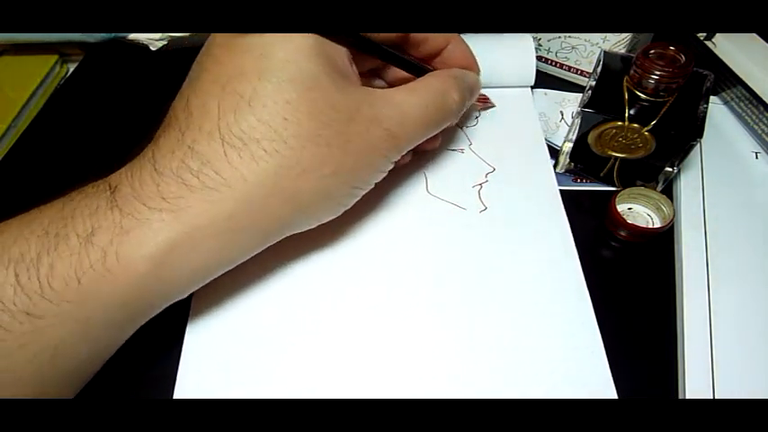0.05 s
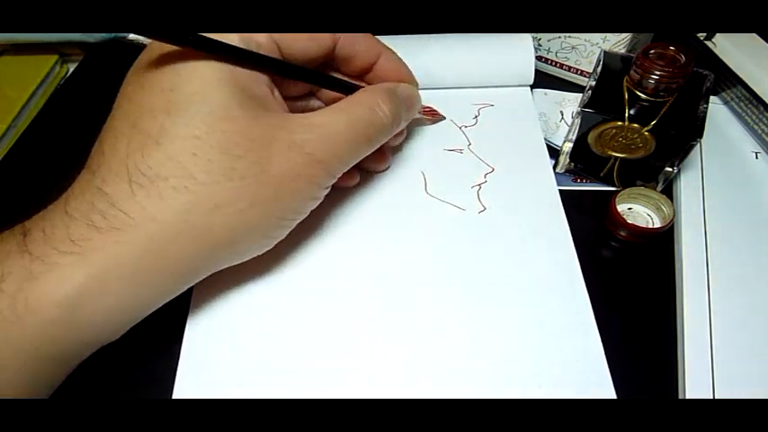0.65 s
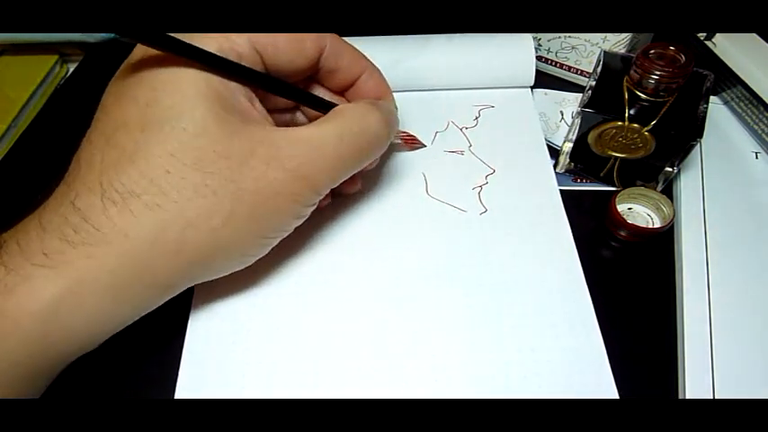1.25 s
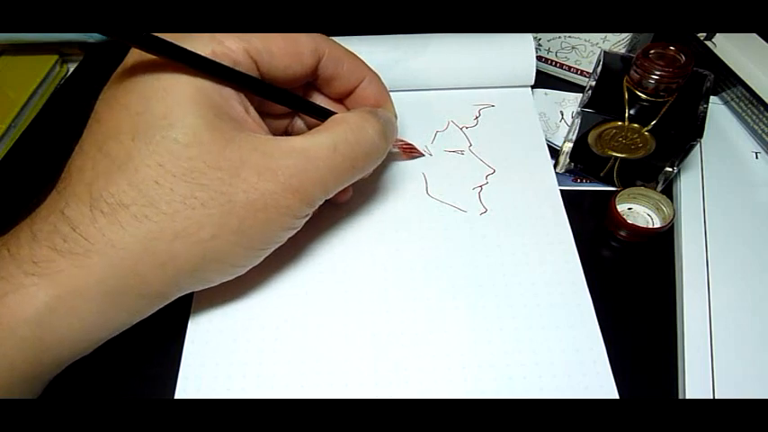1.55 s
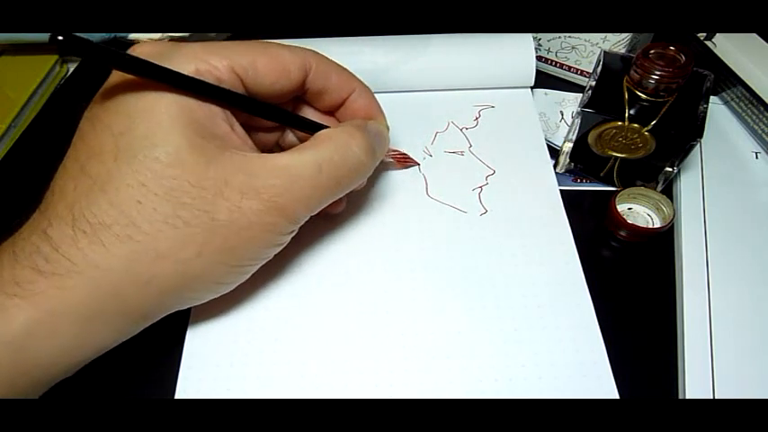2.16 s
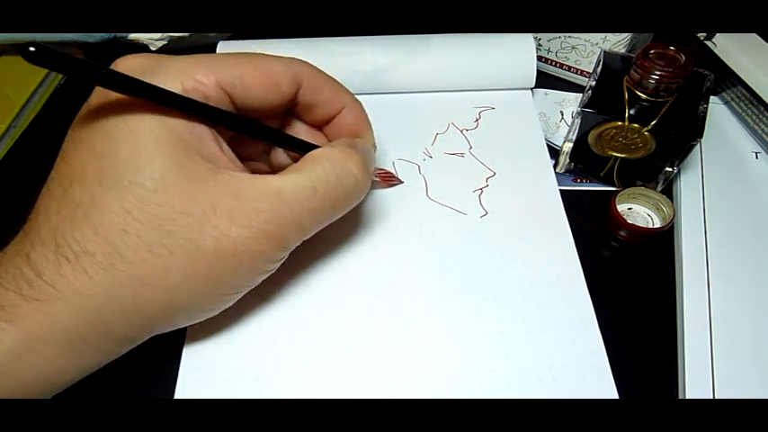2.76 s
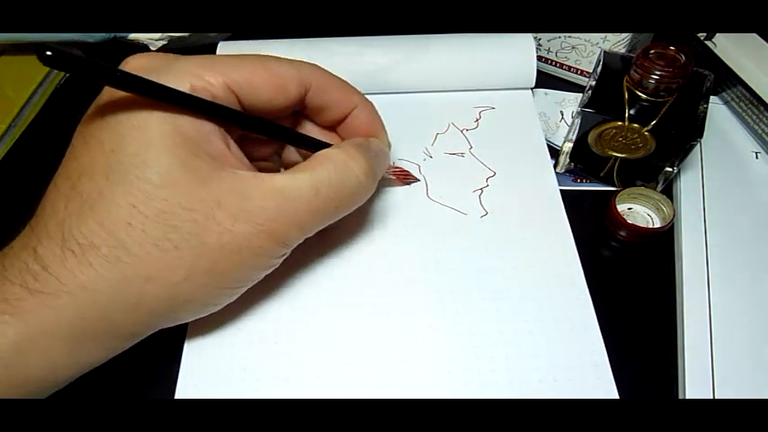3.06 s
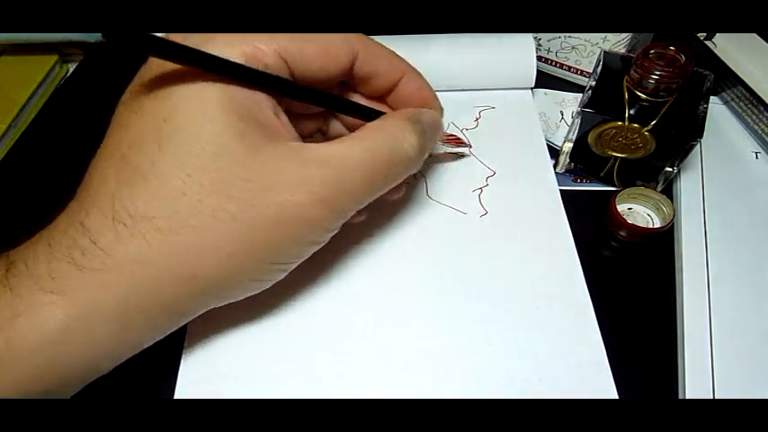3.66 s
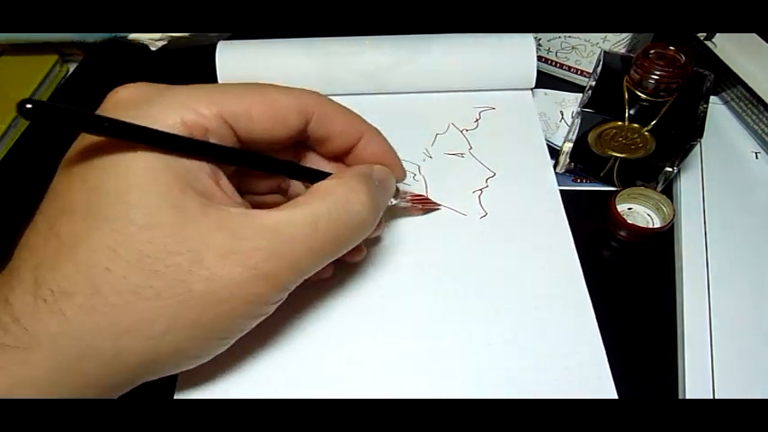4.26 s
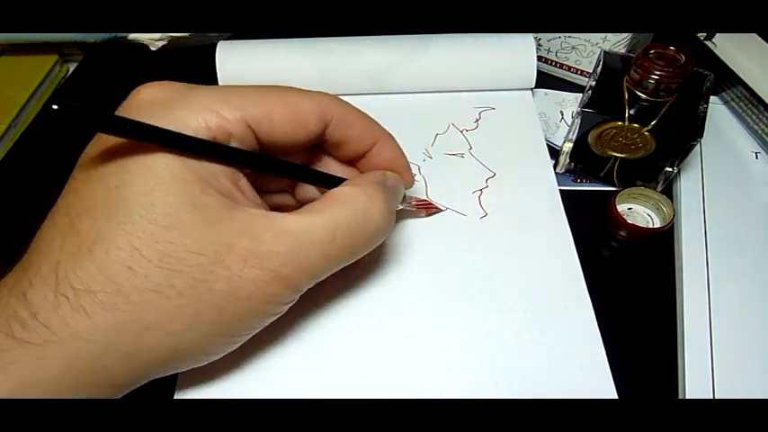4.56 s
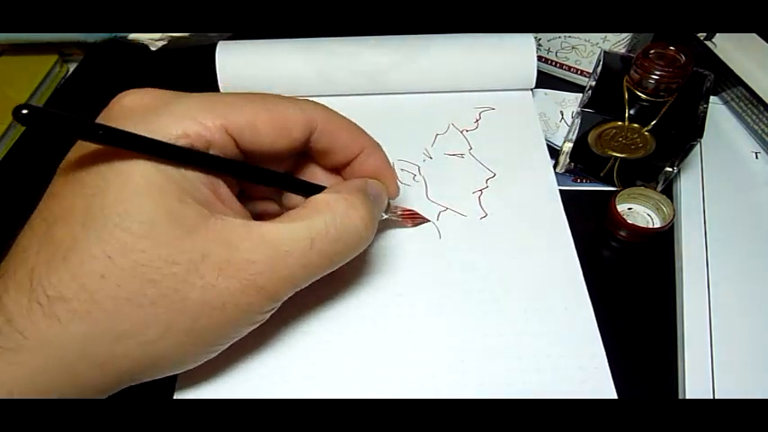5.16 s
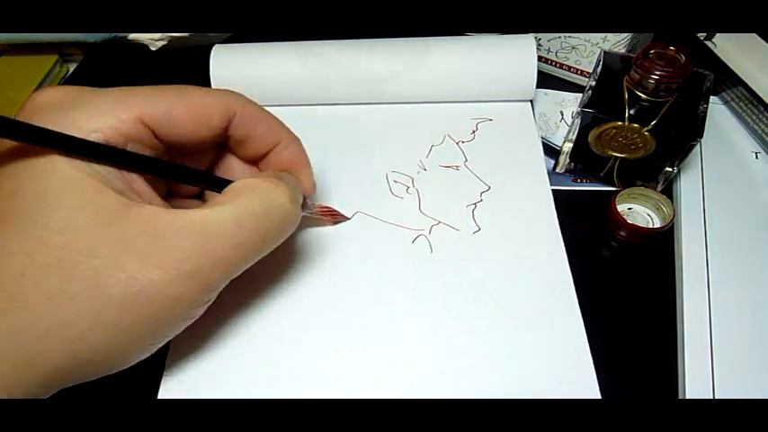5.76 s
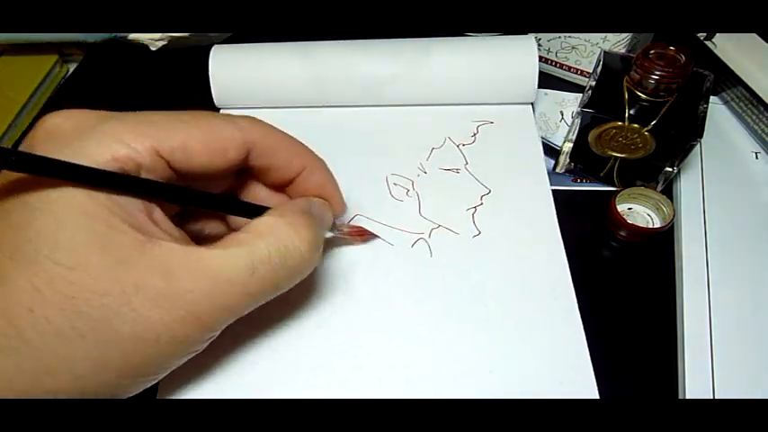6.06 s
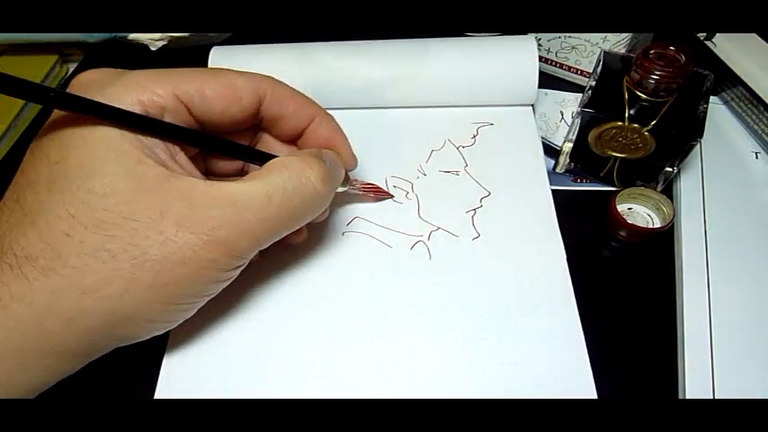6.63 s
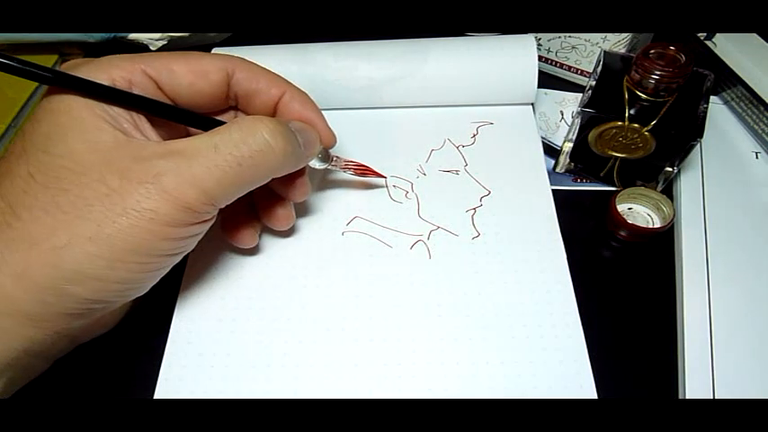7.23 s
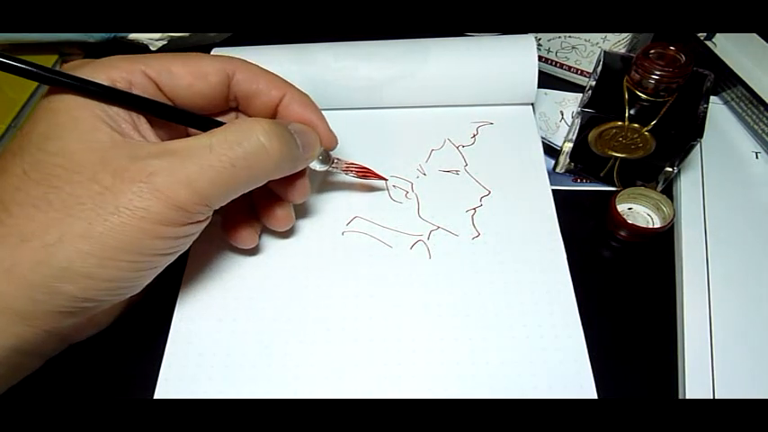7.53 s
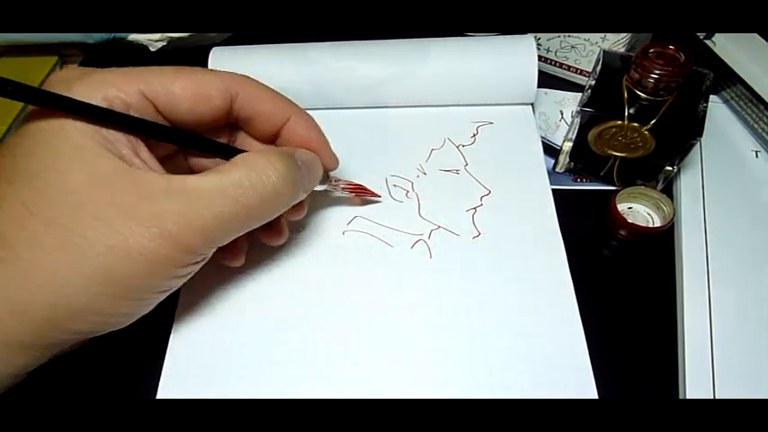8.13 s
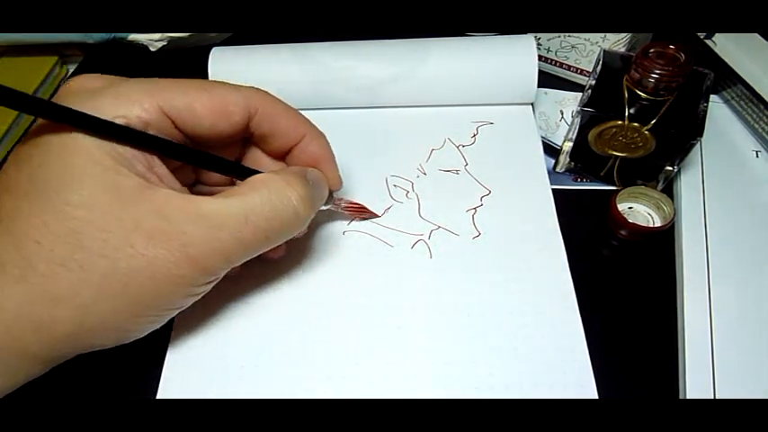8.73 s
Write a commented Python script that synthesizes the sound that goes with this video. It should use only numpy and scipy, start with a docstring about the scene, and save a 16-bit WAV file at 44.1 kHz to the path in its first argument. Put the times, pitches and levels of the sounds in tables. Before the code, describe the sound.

A fan motor hums with a slow throb over steady hiss for the whole nine seconds, in a quiet furnished room with little echo. Close to the microphone, a dip pen scratches on a paper pad in faint, dry strokes, each about a tenth of a second long. The nib lands with a small, hollow tap at 0.2 seconds and more lightly around 0.8 and 1.3. Irregular strokes continue until 3.4 seconds, pause, then return from 4.5 to 6.3. Around 6.9 seconds a hand rubs the paper, with a soft tick. At about 7.3 seconds something small and hard clatters once on the desk, a rapid cluster of clicks and knocks ending in a sharp, briefly ringing hit, by far the loudest sound. The hand shifts softly near 7.7 and 8.2 seconds, and three more pen strokes follow between 8.4 and 8.8.

```python
"""Short, scratchy strokes are heard first: a dip pen sketching on a paper pad, near a small camera.
The nib plucks paper fibres, and these impulses excite the resonances of sheet, pad and nib.
Late on, something small and hard clatters once on the desk, each impact ringing both bodies.
Behind, a fan motor hums with a slow throb over steady hiss and a few faint, thin whistles.
The two microphone ports are of nearly opposite polarity, and the right one is thin in the bass."""
import sys
import numpy as np
from scipy import signal
from scipy.fft import rfft, irfft, next_fast_len
from scipy.io import wavfile
from scipy.ndimage import map_coordinates

SR = 44100
rng = np.random.default_rng(int(sys.argv[2]) if len(sys.argv) > 2 else 0)


def wav_record(signal):
    """Record a signal, one row per channel, as 16-bit PCM in the file named by sys.argv[1]."""
    frames = np.transpose(np.atleast_2d(signal))
    bounded = np.clip(frames, -1, 1)
    # unit amplitude maps onto the largest positive 16-bit level
    quanta = np.round(bounded * 32767).astype(np.int16)
    wavfile.write(sys.argv[1], SR, quanta)


N = 392049

# nib strokes: t/s, length/s, level/dB, paper's low rustle/dB, pad's hollow ring/dB, nib's ring/dB,
# sizzle of the edge digging in/dB
STROKES = [(-0.03, 0.086, -52.5, -6, 12, 6, -8), (0.166, 0.085, -41.5, 1.5, 2.5, 10, -9.5),
           (0.755, 0.11, -45, 1, 4, 9.5, -5.5), (0.945, 0.09, -45.5, 5.5, 3.5, 14, -4.5),
           (1.288, 0.068, -48, 8, -2, 7, -1), (1.416, 0.05, -54, 3, 10, 4, 6),
           (1.93, 0.095, -53.5, 3, 1, 6, -6), (2.204, 0.12, -47.5, 1.5, 8.5, 8, 0.5),
           (2.5, 0.14, -49.5, 5.5, 0, 10, -4), (2.766, 0.11, -54.5, 7, 11.5, 8, -2),
           (3.086, 0.15, -56.5, 8, 11, 6, -6), (3.278, 0.081, -47.5, 0, 8.5, 6, 1),
           (3.38, 0.04, -52.5, 10, -9, 4, -1), (4.537, 0.088, -49, 5, 7.5, 4, -13),
           (4.693, 0.11, -50, 5, 7.5, 3, -9), (5.059, 0.11, -46.5, 2, -1, 3, -4.5),
           (5.135, 0.073, -52.5, 3, 7, 3, -5), (5.182, 0.13, -44, 2, 3, 6, -11),
           (5.508, 0.2, -45.5, 2, 5.5, 7, -1.5), (5.706, 0.14, -44.5, -1, 3.5, 5, -11.5),
           (6.048, 0.12, -44, 5.5, 6, 6, 1.5), (6.19, 0.085, -48.5, 0, -4, 4, -14),
           (8.422, 0.1, -44.5, -6, -3, 6, -12), (8.639, 0.079, -44.5, -2, 3, 9, -15),
           (8.721, 0.088, -42.5, -1.5, 8, 6, -14.5)]
# spectral envelope of the pad: f/Hz, level/dB
PAD_SPECTRUM = [(60, -43.5), (250, -8.5), (470, -8.5), (620, -21.5), (780, -9.5), (1150, -11.5),
                (1900, -14), (2600, -10.5), (4400, -13.5), (5100, -14), (6300, -21.5), (7200, -24.5),
                (9000, -38.5), (9900, -71)]
# resonances of the pad: f/Hz, width/Hz, gain/dB
PAD_MODES = [(2230, 100, 2), (3400, 140, 4.5), (4600, 130, 1.5), (6740, 110, 4.5), (7440, 270, 4.5),
             (8500, 250, 5), (9400, 200, 10)]
# the top sheet's resonance, set by where the nib works: t/s, f/Hz
SHEET_RESONANCE = [(0.2, 1100), (1.0, 1040), (3.3, 1040), (4.7, 945), (6.1, 870), (8.7, 950)]
# the hand shifting on the paper: t/s, length/s, level/dB
HAND_SHIFTS = [(0.326, 0.14, -51), (6.86, 0.12, -43.5), (7.698, 0.058, -46), (8.197, 0.29, -53)]
# friction of soft skin relative to the nib: f/Hz, gain/dB
SKIN_COLOUR = [(1080, -3), (1450, 5.5), (1900, -1), (3600, -1.5), (7300, -12.5)]
# the nib landing on the pad: t/s, level/dB
NIB_TAPS = [(0.198, -27), (0.787, -40), (1.325, -41)]
# impacts on the desk: t/s, click/dB, object's ring/dB, thump/dB, thump f/Hz, knock/dB, knock f/Hz
IMPACTS = [(6.886, -46, -49, -55, 350, -32, 1500), (7.2417, -41, -50, -46, 350, -29, 1500),
           (7.2643, -36, -40, -24, 360, -38, 620), (7.277, -20, -32, -14.5, 354, -27, 620),
           (7.288, -23, -34, -33, 406, -32, 830), (7.2971, -22, -36, -29, 398, -29, 1500),
           (7.3093, -14, -18, -24, 316, -24, 1500), (7.321, -28, -38, -10.5, 378, -12.5, 850),
           (7.3382, -11.5, -0.5, -35, 397, -7.5, 1500), (7.3408, -32, -36, -9.5, 316, -22, 650),
           (7.3443, -19, -15, -29, 298, -36, 1500)]
# spectral envelope of the object's clicks: f/Hz, level/dB
CLICK_SPECTRUM = [(60, -26), (200, -13), (400, -9), (1050, -8), (2000, -5.5), (2500, -5.5), (2950, -6.5),
                  (4050, -6), (5000, -9), (5500, -9), (6000, -18), (6900, -23), (8600, -42.5), (9500, -46),
                  (10300, -54), (11000, -76)]
# peaks and dips in that envelope: f/Hz, width/Hz, gain/dB
CLICK_PEAKS = [(1500, 310, 4.5), (2230, 110, 3), (2570, 140, -6), (3600, 250, -6), (4400, 220, 5.5)]
# the object's bright modes: f/Hz, level/dB, T60/s
OBJECT_MODES = [(3150, -7, 0.011), (3670, -6, 0.01), (4380, -6.5, 0.017), (4680, -9.5, 0.019)]
# the desk's modes: f/Hz, level/dB, T60/s
DESK_MODES = [(620, 8.5, 0.025), (825, -1, 0.054), (1500, 4.5, 0.011)]
# the thin scrape of the skid: f/Hz, level/dB
SKID_SPECTRUM = [(1300, 2), (2500, -7), (4200, -3), (6000, 1.5)]
# the fan motor's line spectrum: f/Hz, level/dB, throb depth (0-1)
MOTOR_LINES = [(118.7, -67.5, 0.4), (191, -80, 1), (239.1, -43, 0.62), (265.1, -56.5, 0.16),
               (362, -58, 0.08), (484, -69.5, 0)]
# moving air: f/Hz, level/dB
AIR_SPECTRUM = [(20, -21), (55, -9.5), (130, -6), (200, -2.5), (260, 4), (292, -1.5), (320, 2), (400, -5.5),
                (700, -6), (1500, -10), (2650, -15.5), (2950, -11.5), (3500, -19), (4500, -22), (6500, -32),
                (10000, -69.5)]
# faint whistles: start t/s, end t/s, start f/Hz, end f/Hz, level/dB
WHISTLES = [(1.95, 2.05, 5050, 4950, -67), (4.74, 4.92, 5300, 5350, -65), (4.86, 4.95, 6520, 6750, -67),
            (4.93, 5.13, 5020, 5200, -64.5), (7.21, 7.27, 5400, 5550, -65)]
# the room's reverberation time: f/Hz, T60/s
ROOM_DECAY = [(150, 0.25), (320, 0.29), (900, 0.21), (4000, 0.23), (9000, 0.15)]
# right port relative to left: f/Hz, gain/dB, phase lag/rad
RIGHT_PORT = [(60, -13.5, 1.04), (190, -11.5, 1.22), (257, -8, 1.74), (580, -3, 2.124), (890, -2, 2.505),
              (2480, -0.84, 2.548), (4920, 0.5, 2.34), (8040, 11, 1.2), (8140, 11, 4.5)]
# each port's self-noise: f/Hz, level/dB
HISS_SPECTRUM = [(20, -22), (100, -8), (450, 10), (1500, 0), (3300, 1), (5500, 0.5), (6500, -3),
                 (7300, -10.5), (9000, -21), (10000, -33), (11000, -44)]

HOLLOW_FROM_HZ, HOLLOW_TO_HZ = 1392, 1502  # the pad's hollow ring rises as the nib travels


def pen(fibres_per_s=9000, scatter_db=2.0, catch_db=1.5, gain_db=-1.46):
    """Impulse excitation: nib and hand pluck paper fibres at random, and the pad resonates."""
    plucks = (rng.random(N) < fibres_per_s / SR) * rng.standard_normal(N)
    plucks *= amp(scatter_db * rng.standard_normal(N))
    plucks *= amp(catch_db * wobble(90))  # the nib catches and frees unevenly
    friction = amp(gain_db) * unit(resonate(plucks, PAD_SPECTRUM, PAD_MODES))
    out = np.zeros(N)
    for start, length, db, *colour in STROKES:
        scratch = amp(db) * slide(friction, start, length)
        sheet_hz = np.interp(start, *np.transpose(SHEET_RESONANCE))
        early = filtered(scratch, stroke_response(db, *colour, HOLLOW_FROM_HZ, sheet_hz))
        late = filtered(scratch, stroke_response(db, *colour, HOLLOW_TO_HZ, sheet_hz))
        travel = np.sin(np.linspace(0, np.pi / 2, len(scratch))) ** 2
        add(out, max(start, 0), early + travel * (late - early))
    for start, length, db in HAND_SHIFTS:
        rub = filtered(slide(friction, start, length), lambda hz: amp(along(SKIN_COLOUR, hz)))
        add(out, start, amp(db) * rub)
    return out


def slide(friction, start, length, attack_s=0.064, release_s=0.053):
    """Friction noise follows sliding speed, which rises, holds and falls."""
    i = np.arange(max(round(start * SR), 0), round((start + length) * SR))
    t = i / SR - start
    speed = np.minimum(t / min(attack_s, length / 2), (length - t) / min(release_s, length / 2))
    return friction[i] * np.sin(np.pi / 2 * speed.clip(0, 1))


def stroke_response(db, body_db, ring_db, nib_db, sizzle_db, hollow_hz, sheet_hz, usual_db=-41.5):
    """Resonant filtering: sheet, pad and steel nib each add a peak; pressure and sizzle add rasp."""
    rasp_db = -0.5 + 0.25 * (db - usual_db) + 0.29 * sizzle_db
    slope = [(1080, body_db), (1330, 0), (1900, 0), (3600, rasp_db), (5500, rasp_db), (7300, sizzle_db)]
    peaks = [(sheet_hz, 177, 8), (hollow_hz, 153, 12.5 + ring_db), (3930, 190, nib_db)]
    return lambda hz: amp(envelope_db(slope, peaks, hz))


def nib_taps(t60=0.035):
    """Free vibration: the landing nib strikes the pad's hollow mode."""
    out = np.zeros(N)
    for start, db in NIB_TAPS:
        add(out, start, amp(db) * mode(HOLLOW_FROM_HZ, t60))
    return out


def clatter(snap=0.72, grit=0.88, click_t60=0.022, ring_top_hz=5200, click_room_db=-10, desk_room_db=-19):
    """Impact excitation: a hard object tips, skids and lands, clicking and ringing with the desk."""
    t = np.arange(SR // 4) / SR
    clicks, desk, rings = np.zeros((3, N))
    for start, click_db, ring_db, *blow in IMPACTS:
        burst = amp(-60 * t / click_t60) * rng.standard_normal(len(t))
        add(clicks, start, amp(click_db) * (snap * (t == 0) + grit * burst))
        add(rings, start, sum(amp(ring_db + db) * mode(hz, t60) for hz, db, t60 in OBJECT_MODES))
        add(desk, start, struck_desk(*blow))
    # the low-pass smooths the start of each ring, keeping it free of high fizz
    rings = signal.sosfilt(signal.butter(4, ring_top_hz, fs=SR, output="sos"), rings)
    clicks += skid()
    direct = resonate(clicks, CLICK_SPECTRUM, CLICK_PEAKS)
    spread = resonate(clicks, CLICK_SPECTRUM, [])  # the room receives only the broad envelope
    reverberation = room(amp(click_room_db) * spread + amp(desk_room_db) * (desk + rings))
    return direct + rings + desk + reverberation


def struck_desk(thump_db, thump_hz, knock_db, knock_hz, peak_cycles=1.08, spot_octaves=0.37):
    """Modal response: a heavily damped thump, a faint after-ring and the modes the struck spot favours."""
    t = np.arange(SR // 3) / SR
    rise = thump_hz * t / peak_cycles
    thump = amp(thump_db) * rise * np.exp((1 - rise ** 2) / 2) * np.sin(2 * np.pi * thump_hz * t)
    after_ring = amp(thump_db - 18.5) * mode(hz=316, t60=0.28)
    knock = sum(amp(knock_db + db) * hump(np.log2(hz / knock_hz), 0, spot_octaves) * mode(hz, t60)
                for hz, db, t60 in DESK_MODES)
    return thump + after_ring + knock


def skid(start=7.287, end=7.328, gain_db=-31.5, rough_db=3):
    """Sliding friction: the object scrapes briefly, a noise of uneven level."""
    t = np.arange(N) / SR
    level = amp(gain_db + rough_db * wobble(400)) * ((t > start) & (t < end))
    return level * coloured(rng.standard_normal(N), SKID_SPECTRUM)


def fan(slip_hz=3.503, sharpness=2.2, waver_db=0.5, air_db=-47.5):
    """Induction motor slip: over air noise, the hum dips each time the rotor lags one more pole."""
    t = np.arange(N) / SR
    dip = np.exp(sharpness * (np.cos(2 * np.pi * slip_hz * t) - 1))
    hum = np.zeros(N)
    for hz, db, depth in MOTOR_LINES:
        phase = 2 * np.pi * (hz * t + rng.random()) + 0.038 * wobble(3.6)
        hum += np.sqrt(2) * amp(db + waver_db * wobble(2.23)) * (1 - depth * dip) * np.sin(phase)
    return hum + amp(air_db) * coloured(rng.standard_normal(N), AIR_SPECTRUM)


def whistles(waver=0.021, flutter_db=3):
    """Random frequency and amplitude modulation: thin tones waver, barely above the hiss."""
    out = np.zeros(N)
    drift = 1 + waver * wobble(190)
    for start, end, from_hz, to_hz, db in WHISTLES:
        n = round((end - start) * SR)
        pitch = np.linspace(from_hz, to_hz, n) * drift[round(start * SR):][:n]
        swell = np.sin(np.linspace(0, np.pi, n))
        add(out, start, amp(db) * swell * np.sin(2 * np.pi * np.cumsum(pitch) / SR))
    return out * amp(flutter_db * wobble(88))


def room(x):
    """Reverberation: in a furnished room each band dies away quickly, at its own exponential rate."""
    hz, t, bands = signal.stft(rng.standard_normal(SR // 3), SR, nperseg=256)
    decay = amp(-60 * t / along(ROOM_DECAY, hz)[:, None])
    tail = signal.istft(bands * decay, SR, nperseg=256)[1]
    delayed = np.pad(x, (SR // 250, 0))
    return signal.fftconvolve(delayed, tail / np.linalg.norm(tail))[:N]


def ports(left, diffuse, crossover_hz=4500):
    """Phase lag: the right port nearly inverts the sound, with less bass and its own diffuse treble."""
    table = np.array(RIGHT_PORT)
    gain, lag = table[:, :2], table[:, ::2]
    right = left + filtered(diffuse, lambda hz: hz ** 2 / (hz ** 2 + crossover_hz ** 2))
    right = filtered(right, lambda hz: amp(along(gain, hz)) * np.exp(-1j * along(lag, hz)))
    return np.array([left, right])


def electronics(hiss_db=-58, whine_db=-91, whine_hz=11025):
    """Self-noise: the ports hiss independently and share a very faint whine."""
    hiss = coloured(rng.standard_normal((2, N)), HISS_SPECTRUM)
    whine = np.sin(2 * np.pi * whine_hz * np.arange(N) / SR)
    return amp(hiss_db) * hiss + amp(whine_db) * whine


def mode(hz, t60, rise_cycles=0.71):
    """A damped oscillator: it swings up, then decays exponentially."""
    t = np.arange(SR // 3) / SR
    return amp(-60 * t / t60) * np.sin(2 * np.pi * hz * t) * (1 - np.exp(-hz * t / rise_cycles))


def resonate(x, slope, peaks, size=2048):
    """Convolution with a body's minimum-phase impulse response of unit energy."""
    hz = np.fft.rfftfreq(size, 1 / SR)
    cepstrum = irfft(np.log(amp(envelope_db(slope, peaks, hz))))
    cepstrum[1:size // 2] *= 2  # folding the cepstrum makes the response causal
    cepstrum[size // 2 + 1:] = 0
    response = irfft(np.exp(rfft(cepstrum)))
    return signal.fftconvolve(x, response / np.linalg.norm(response))[:N]


def envelope_db(slope, peaks, hz):
    """A spectral envelope: a broad slope plus resonances (f/Hz, width/Hz, gain/dB)."""
    return along(slope, hz) + sum(db * hump(hz, centre, width) for centre, width, db in peaks)


def hump(x, centre, width):
    """A Gaussian bell, 1 at its centre."""
    return np.exp(-((x - centre) / width) ** 2)


def coloured(x, spectrum):
    """Spectral shaping, at rms 1."""
    return unit(filtered(x, lambda hz: amp(along(spectrum, hz))))


def filtered(x, response):
    """Linear filtering: the spectrum times a complex frequency response."""
    n = x.shape[-1]
    size = next_fast_len(n + SR // 4)
    return irfft(rfft(x, size) * response(np.fft.rfftfreq(size, 1 / SR)), size)[..., :n]


def along(points, hz):
    """Interpolation of (f/Hz, value) points on a logarithmic frequency axis."""
    f, values = np.transpose(points)
    return np.interp(np.log(hz + 1), np.log(f + 1), values)


def wobble(rate):
    """Smooth random modulation, with rate knots a second."""
    knots = rng.standard_normal(int(N * rate / SR) + 4)
    return map_coordinates(knots, [np.arange(N) * rate / SR])


def add(track, start, sound):
    """Superposition: a sound joins the track at its start time."""
    i = round(start * SR)
    part = sound[max(-i, 0):N - i]
    track[max(i, 0):][:len(part)] += part


def amp(db):
    """Decibels to amplitude ratio."""
    return 10 ** (np.asarray(db) / 20)


def unit(x):
    """Normalisation to rms 1."""
    return x / np.sqrt(np.mean(x ** 2) + 1e-20)


def scene(pen_room_db=-13, diffuse_db=-18.02):
    """Superposition: pen, clatter, fan and whistles reach the two ports with the room's reverberation."""
    knocks = clatter()
    strokes = pen() + nib_taps()
    near = knocks + strokes + amp(pen_room_db) * room(strokes)
    left = near + fan() + whistles()
    diffuse = amp(diffuse_db) * room(knocks + strokes)
    return ports(left, diffuse) + electronics()


def record(dry, ceiling=0.95, notch_hz=8000, notch_width_hz=330, notch_db=-19, top_hz=11080):
    """Saturation and band limiting: the camera rounds peaks, notches the treble and cuts off the top."""
    rounded = dry / (1 + (dry / ceiling) ** 8) ** (1 / 8)
    return filtered(rounded, lambda hz: amp(notch_db * hump(hz, notch_hz, notch_width_hz)) * (hz < top_hz))


dry = scene()
out = record(dry)
wav_record(out)
```